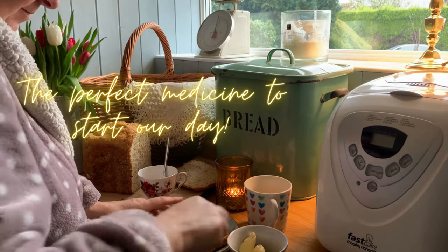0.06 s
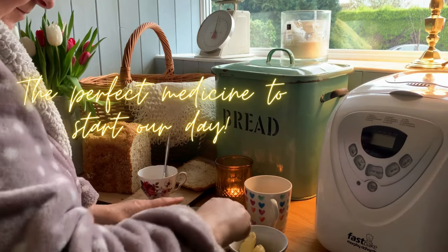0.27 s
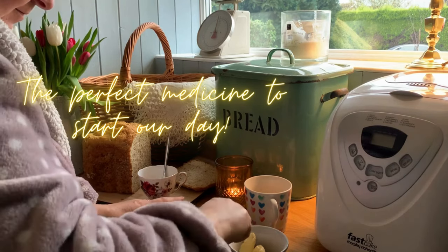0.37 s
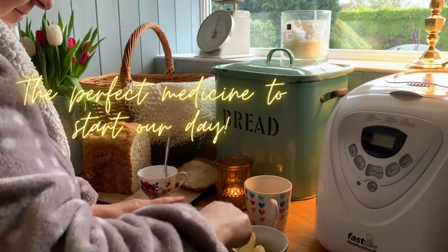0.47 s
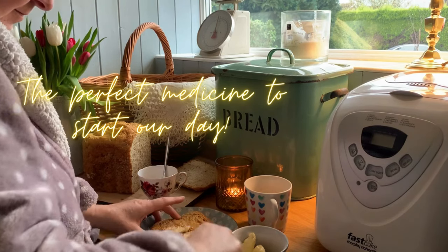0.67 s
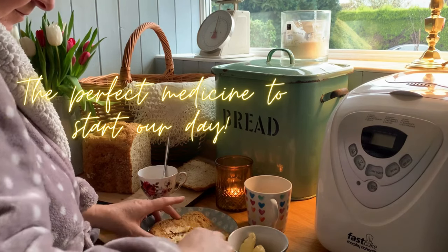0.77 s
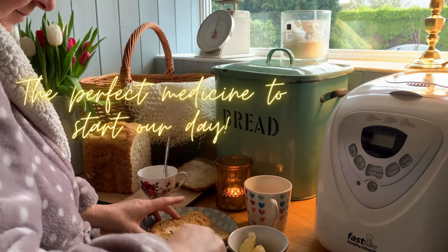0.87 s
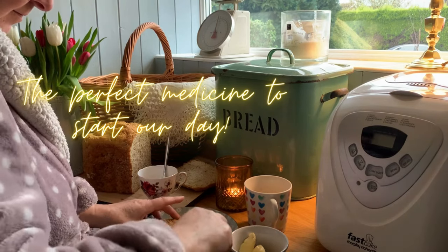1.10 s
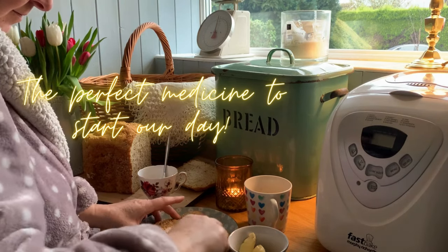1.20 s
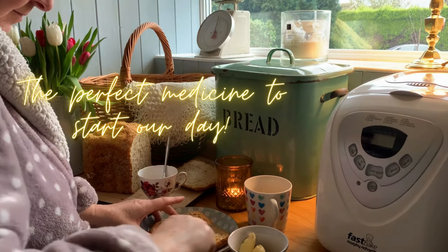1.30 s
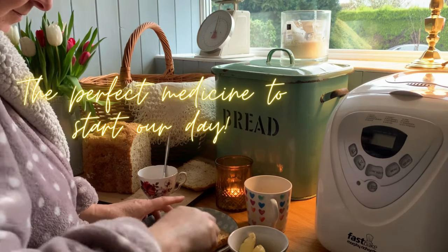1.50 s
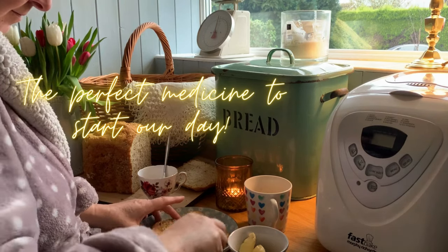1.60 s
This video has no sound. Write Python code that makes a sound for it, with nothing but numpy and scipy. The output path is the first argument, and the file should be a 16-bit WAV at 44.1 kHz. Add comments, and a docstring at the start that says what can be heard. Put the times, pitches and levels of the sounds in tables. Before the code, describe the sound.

Butter being scraped over toast with a knife, after two light clinks on a dish.

```python
"""Buttering toast

A counter in a small kitchen, the microphone close to the plate. A table knife clinks twice against
crockery, then spreads butter over toast in a few strokes. The blade crackles over the crust, the slice
rasps, and plate and counter thud dully under the hand. The room rings briefly behind it."""
import sys
import numpy as np
from scipy import signal
from scipy.fft import rfft, irfft, next_fast_len
from scipy.io import wavfile
from scipy.ndimage import uniform_filter1d, map_coordinates

SR = 44100
rng = np.random.default_rng(int(sys.argv[2]) if len(sys.argv) > 2 else 0)


def transcribe(signal):
    """Save signal, clipped to [-1, 1], as a 16-bit WAV file at the path in sys.argv[1]."""
    frames = np.atleast_2d(signal).T
    limited = np.clip(frames, -1, 1)
    pcm = np.round(limited * 32767).astype(np.int16)
    wavfile.write(sys.argv[1], SR, pcm)


N = 72765

# Knife on crockery; the last two contacts merge into one clink. Each row: start in seconds, level in dB,
# pitch factor, damping in dB per second, buzz width in Hz, relative crack level in dB.
CONTACTS = [(.2393, -23.5, 1.001, -3, 1.2, -8.5), (.3352, -25.5, 1.003, 201.5, 70, -8.5),
            (.3445, -32, 1.02, 297, 120, -8)]
# Modes of a clink. Each row: pitch in Hz, level in dB, t60 in seconds, left over right in dB.
CLINK_MODES = [(557.4, -15, 0.091, 11), (1334, -18.5, 0.29, -9.5), (1370, -16.5, 0.13, -1),
               (1927, -16.5, .22, 3.5), (2236, -20, 0.14, -4), (2141, 5, 0.27, -0.5),
               (2256, -19.5, 0.18, -3.5), (2770, -27.5, 1, 1.5), (3796, -19.5, 0.14, -11),
               (5398, -7.5, 0.11, -19), (5670, -9, 0.05, -8.5), (9682, -4, 0.15, 1),
               (12040, -14.5, 0.073, 0), (14310, -22, .11, -6), (14300, -9.5, .11, -0.5)]
# The spreading strokes. Each row: time in seconds, crackle level in dB, rasp level in dB.
EARLY_STROKES = [(.35, -45, -53), (.42, -51.5, -57.5), (.45, -45, -57.5), (.49, -51.5, -58),
                 (.52, -48, -52), (.55, -54, -62), (.595, -57, -60.5), (.645, -42.5, -49.5),
                 (.69, -47, -58), (.74, -47, -54), (.79, -46.5, -53), (.86, -40.5, -48),
                 (.89, -41.5, -48.5), (.928, -48, -60), (.955, -45.5, -53.5), (1.0, -58.5, -75.5),
                 (1.07, -85.5, -116)]
FINAL_STROKE = [(1.175, -96, -115), (1.2, -65, -70.5), (1.225, -46, -52.5), (1.255, -49.5, -52),
                (1.275, -42, -49), (1.295, -41, -49.5), (1.325, -37, -51), (1.35, -36, -47),
                (1.395, -39, -52), (1.45, -51, -66.5), (1.5, -65.5, -72.5), (1.58, -86, -113)]
# Crust snapping under the edge. Each row: start in seconds, level in dB.
CRUST_SNAPS = [(0.4833, -41), (0.5043, -36.5), (0.6365, -42), (0.8474, -45), (0.9436, -44.5),
               (1.2166, -57.5), (1.266, -36), (1.343, -34), (1.361, -32), (1.382, -36.5), (1.409, -37)]
# Level curves of the thudding and of a sleeve. Each row: time in seconds, level in dB.
THUD_LEVELS = [(0, -52.5), (.07, -58), (.13, -67.5), (.2, -58), (.4, -48.5), (.49, -65), (.58, -51),
               (.645, -50.5), (.69, -42.5), (.79, -48.5), (.885, -34), (.93, -43.5), (.96, -43),
               (1.06, -57), (1.165, -84.5), (1.205, -50.5), (1.26, -48.5), (1.4, -47), (1.55, -62),
               (1.65, -86.5)]
SLEEVE_LEVELS = [(0, -64.5), (.025, -69), (.06, -100), (.125, -75), (.17, -95), (.22, -100)]
# Resonances of the blade, and of plate and counter. Each row: centre in Hz, width in Hz, level in dB.
BLADE_MODES = [(4690, 130, -15), (6310, 270, -6.5), (8250, 44, 6.5), (9010, 60, 0.5), (10564, 140, 8),
               (10586, 100, 0), (12800, 290, 3.5)]
COUNTER_MODES = [(99.4, 4.6, -3.5), (120.6, 7, -6), (145.8, 11.5, 2), (221.2, 7.5, 3.5), (290.6, 14, -13.5),
                 (345.6, 14, -15), (542, 8.3, -25.5), (650, 13, -19)]
# Spectra of a clink's crack, the crust, the slice, the room's air and its reverberation.
# Each row: frequency in Hz, relative level in dB.
CRACK_SPECTRUM = [(100, -23), (200, -3), (500, 8), (850, -4.5), (1300, 4.5), (1750, -12), (2200, 2),
                  (3000, -5.5), (4500, -10.5), (5600, 6), (7500, -9), (10500, -10), (12200, -8.5),
                  (15500, -11)]
CRUST_SPECTRUM = [(1500, -55), (3000, -10.5), (4700, -17), (5800, -24), (6400, 2), (7200, -4), (8250, -4.5),
                  (9300, 1.5), (10500, -3), (11600, 0), (12900, 1), (14200, -0.5), (15700, 0.5)]
RASP_SPECTRUM = [(150, -18.5), (300, 8.5), (500, 2), (700, 3.5), (1050, 5.5), (1700, -1), (2300, -1),
                 (2900, -6.5), (5000, -7.5), (9000, -19)]
AIR_SPECTRUM = [(25, -8), (60, 5.5), (130, -7.5), (270, 1), (420, -11), (800, -16.5), (1500, -28.5),
                (3500, -31.5), (6500, -31.5), (15000, -34)]
REVERB_SPECTRUM = [(150, -7.5), (1000, -1), (2150, -8.5), (3000, -6.5), (5500, -2.5), (9000, -16.5),
                   (15000, -27.5)]
# The kitchen's decay. Each row: frequency in Hz, t60 in seconds.
ROOM_DECAY = [(150, 0.4), (1000, 0.23), (2300, 0.44), (5500, .38), (10000, 0.23), (15000, 0.13)]

GRIP_AFTER_S, GRIP_DB = .0135, -12  # the blade settles after the second contact and chokes the ring
GRIP_HZ, GRIP_SLOPE = 2200, .7  # the choking is full up to this pitch and weakens above it
CRUMBS_PER_S, CRUMB_SPREAD_DB = 4400, 3
CHATTER_HZ, CHATTER_DB = 110.35, 0.7  # the blade catches and slips
KNOCK_DB, BLADE_DB, CRACKLE_DB, RASP_DB, THUD_DB, AIR_DB = -30.5, -1.5, -1.5, -1, -3.5, -68.5


def clinks(room_db):
    """Knife on crockery rings, cracks and knocks the counter; the resting blade buzzes and damps it."""
    out = np.zeros((2, N))
    settled = np.minimum(since(CONTACTS[1][0] + GRIP_AFTER_S) / 0.0035, 1)
    for k, (start, db, pitch, damping, buzz_hz, crack_db) in enumerate(CONTACTS):
        choke_db = -damping * since(start) + (k > 0) * GRIP_DB * settled
        ring = np.zeros((2, N))
        for hz, mode_db, t60, side_db in CLINK_MODES:
            buzz = np.cumsum(rng.standard_normal(N)) * np.sqrt(2 * np.pi * buzz_hz / SR)
            grip = min(1, GRIP_HZ / hz) ** GRIP_SLOPE
            gain = amp(mode_db + rng.normal(0, 1) + choke_db * grip)
            phase = 2 * np.pi * (hz * pitch * since(start) + rng.random()) + buzz
            ring += pan(side_db) * gain * strike(start, rise=4 / hz, t60=t60) * np.sin(phase)
        crack = spread(noise(CRACK_SPECTRUM), side_db=-3) * strike(start, rise=0.00053, t60=0.16)
        blow = amp(db) * (ring + amp(crack_db) * crack)
        out += blow + amp(room_db) * kitchen(blow)
    for start, db, *_ in CONTACTS[:2]:
        knock = strike(start, rise=0.13, t60=0.33) * counter()
        out += amp(KNOCK_DB + db - CONTACTS[0][1]) * knock
    return out


def buttering(room_db):
    """The catching blade breaks crumbs off the crust, sings faintly and rasps through the slice."""
    crackle_gain, rasp_gain = np.add(gains(EARLY_STROKES), gains(FINAL_STROKE))
    chatter = amp(CHATTER_DB * wobble(CHATTER_HZ))
    snaps = sum(amp(db) * strike(start, rise=0.0014, t60=0.032) for start, db in CRUST_SNAPS)
    crumbs = coloured(grains(CRUMBS_PER_S, CRUMB_SPREAD_DB), CRUST_SPECTRUM)
    blade = unit(resonate(grains(CRUMBS_PER_S, CRUMB_SPREAD_DB), BLADE_MODES))
    crackle = spread(patchy(crumbs + amp(BLADE_DB) * blade, depth_db=2.5), side_db=-25)
    friction = coloured(grains(per_s=4000, spread_db=1.5), RASP_SPECTRUM)
    rasp = spread(patchy(friction, depth_db=2.5), side_db=-3) * pan(db=-0.3)
    direct = crackle * (amp(CRACKLE_DB) * crackle_gain * chatter + snaps)
    direct += rasp * amp(RASP_DB) * rasp_gain * chatter
    return direct + amp(room_db) * kitchen(direct)


def thudding():
    """The working hand shakes plate and counter."""
    return amp(THUD_DB) * gains(THUD_LEVELS)[0] * counter()


def counter():
    """Even rumble in the low resonances of plate and counter, a little right of the microphone."""
    rumble = resonate(rng.standard_normal((2, N)), COUNTER_MODES)
    power = np.abs(uniform_filter1d(rumble ** 2, size=1600, axis=1))
    return spread(rumble / np.sqrt(power + 1e-20), side_db=-16) * pan(db=-3.5)


def sleeve():
    """Cloth rustles faintly as the arm moves."""
    ticks = coloured(grains(CRUMBS_PER_S, CRUMB_SPREAD_DB), CRUST_SPECTRUM)
    cloth = ticks + amp(-6.5) * noise(RASP_SPECTRUM)
    return gains(SLEEVE_LEVELS)[0] * spread(cloth, side_db=-4)


def kitchen(x):
    """The small room's answer to x; the high treble dies first."""
    hz, t, bands = signal.stft(rng.standard_normal((2, SR // 2)), SR, nperseg=256)
    t60 = along(ROOM_DECAY, hz)[:, None]
    tail = signal.istft(bands * np.exp(-np.log(1000) * t / t60) / np.sqrt(t60), SR, nperseg=256)[1]
    tail *= 1 - np.exp(-np.arange(tail.shape[1]) / SR / 0.0018)  # reflections build up
    send = filtered(x.mean(0), lambda f: amp(along(REVERB_SPECTRUM, f)))
    return signal.fftconvolve(send[None], tail / np.linalg.norm(tail[0]), axes=1)[:, :N]


def room_air():
    """Quiet, low room tone all around the microphone."""
    return amp(AIR_DB) * spread(noise(AIR_SPECTRUM), side_db=-2.5)


def grains(per_s, spread_db):
    """Two trains of tiny clicks of uneven size."""
    size = amp(spread_db * np.minimum(rng.exponential(size=(2, N)), 5))
    return (rng.random((2, N)) < per_s / SR) * size * rng.choice([-1, 1], (2, N))


def patchy(x, depth_db):
    """The colour shifts at random as the contact point travels."""
    bands = signal.stft(x, nperseg=512)[2]
    patches = uniform_filter1d(rng.standard_normal(bands.shape[1:]), size=7, axis=0)
    patches = unit(uniform_filter1d(patches, size=7, axis=1))
    return unit(signal.istft(bands * amp(depth_db * patches), nperseg=512)[1][:, :N])


def resonate(x, modes):
    """x through parallel resonances of alternating sign."""
    return filtered(x, lambda f: sum((-1) ** k * amp(db) * 1j * f * width / (hz**2 - f**2 + 1j * f * width)
                                     for k, (hz, width, db) in enumerate(modes)))


def strike(start, rise, t60):
    """Envelope of a blow; all times in seconds."""
    t = since(start)
    return (1 - np.exp(-t / rise)) * np.exp(-np.log(1000) * t / t60)


def since(start):
    """Seconds since start, zero before it."""
    return np.maximum(np.arange(N) / SR - start, 0)


def gains(rows):
    """A gain curve per dB column, silent outside the rows unless they reach near the scene's edge."""
    times, *columns = np.transpose(rows)
    return [amp(np.interp(since(0), times, db,
                          left=db[0] if times[0] < .05 else -150,
                          right=db[-1] if times[-1] > 1.6 else -150)) for db in columns]


def wobble(rate):
    """A smooth random curve, rate knots a second."""
    return map_coordinates(rng.standard_normal(N // 20), [np.arange(N) * rate / SR], mode="wrap")


def noise(spectrum):
    """Two unrelated noises with this spectrum."""
    return coloured(rng.standard_normal((2, N)), spectrum)


def coloured(x, spectrum):
    """x shaped by a spectrum, at rms 1."""
    return unit(filtered(x, lambda hz: amp(along(spectrum, hz))))


def filtered(x, response):
    """x through a frequency response."""
    size = next_fast_len(N + SR // 2)
    return irfft(rfft(x, size) * response(np.fft.rfftfreq(size, 1 / SR)), size)[..., :N]


def along(points, hz):
    """A table's value at hz, on a log frequency axis."""
    freqs, values = np.transpose(points)
    return np.interp(np.log(hz + 1), np.log(freqs + 1), values)


def pan(db):
    """Stereo gains, left over right by db."""
    return amp(np.array([[db], [-db]]) / 2)


def spread(pair, side_db):
    """Left and right from a mid and side pair."""
    mid, side = pair[0], amp(side_db) * pair[1]
    return np.array([mid + side, mid - side])


def amp(db):
    """Decibels to gain."""
    return 10 ** (np.asarray(db) / 20)


def unit(x):
    """Scale to rms 1."""
    return x / np.sqrt(np.mean(x ** 2) + 1e-20)


def scene():
    """Knife, toast and plate up close, the kitchen behind."""
    return clinks(room_db=4.0) + buttering(room_db=1.5) + thudding() + room_air() + sleeve()


def record(dry):
    """The microphone's band ends steeply at 16 kHz."""
    return filtered(dry, lambda hz: 1 / (1 + (hz / 16000) ** 120))


dry = scene()
out = record(dry)
transcribe(out)
```